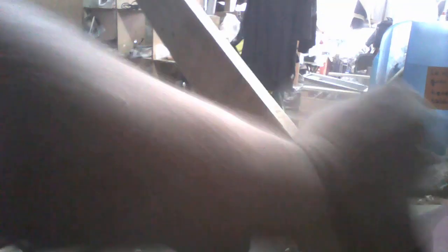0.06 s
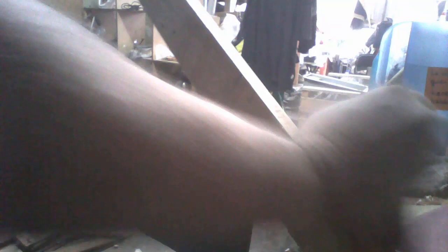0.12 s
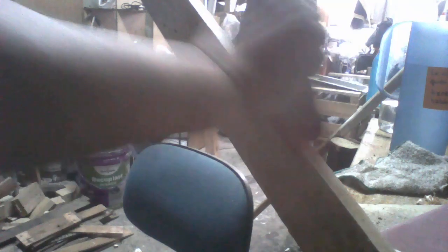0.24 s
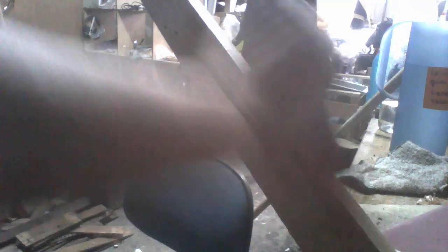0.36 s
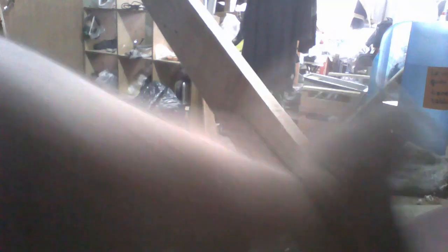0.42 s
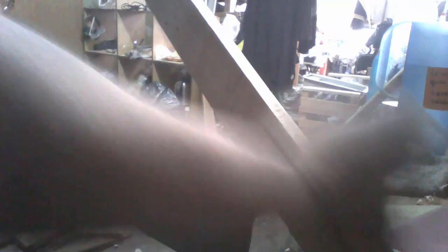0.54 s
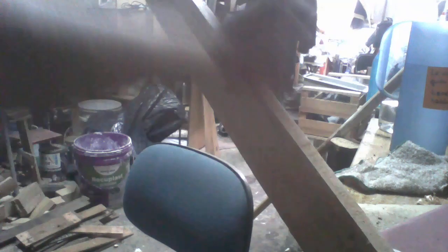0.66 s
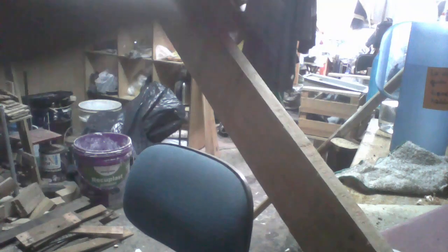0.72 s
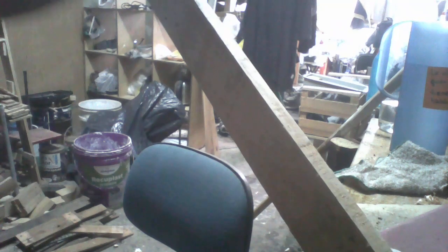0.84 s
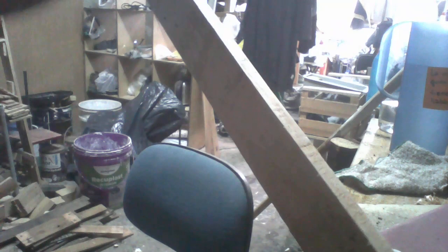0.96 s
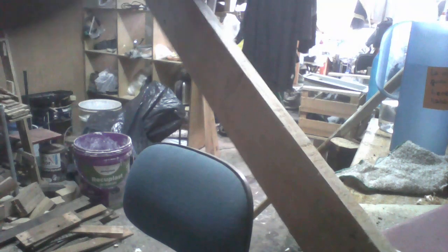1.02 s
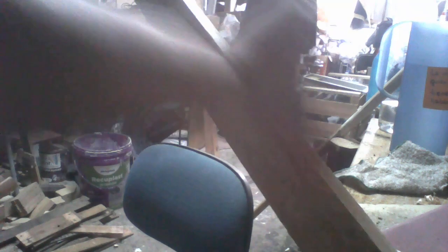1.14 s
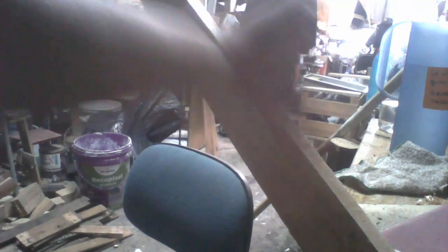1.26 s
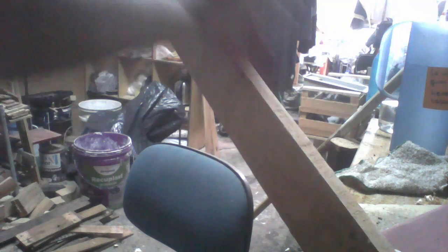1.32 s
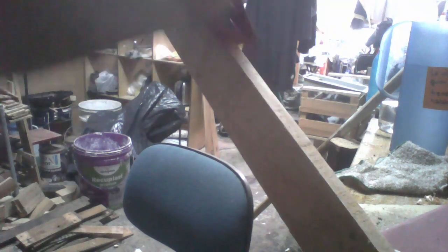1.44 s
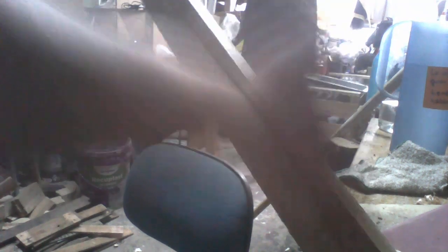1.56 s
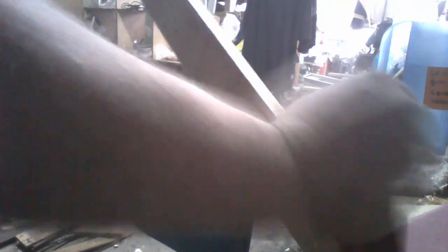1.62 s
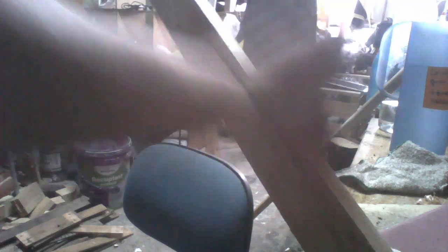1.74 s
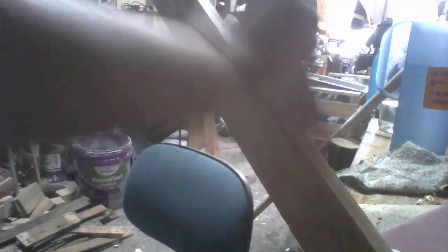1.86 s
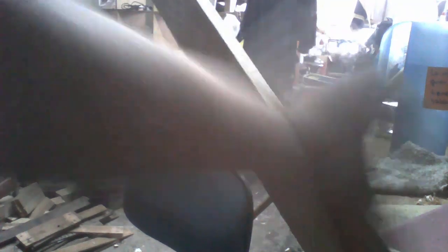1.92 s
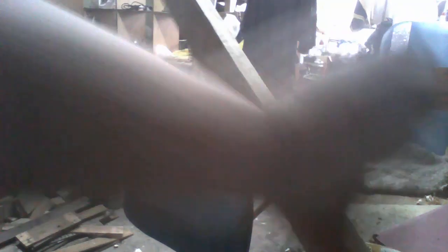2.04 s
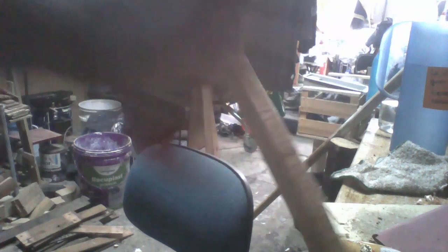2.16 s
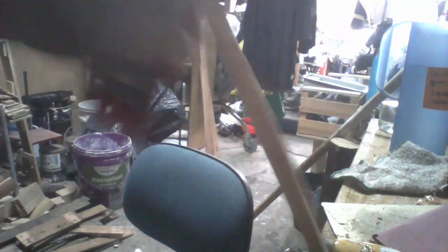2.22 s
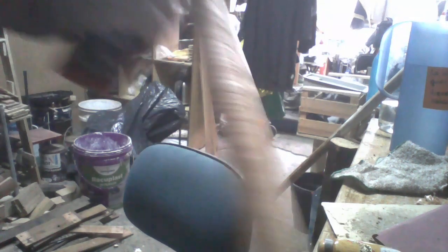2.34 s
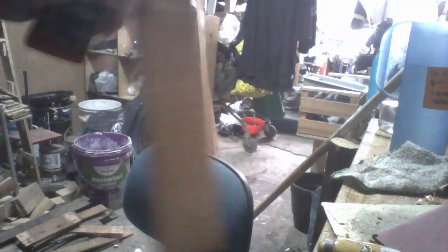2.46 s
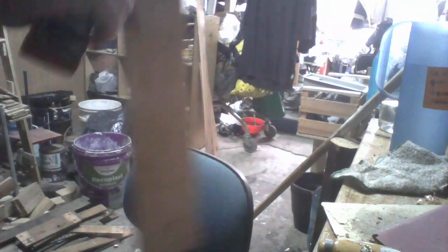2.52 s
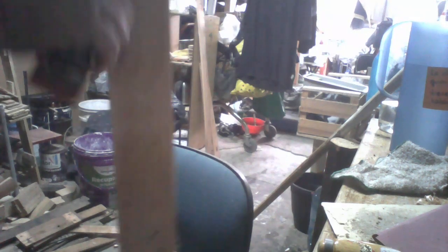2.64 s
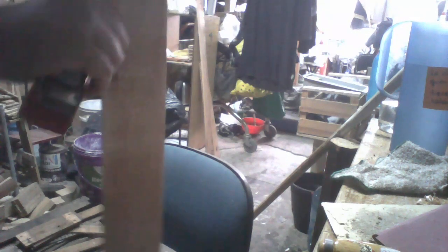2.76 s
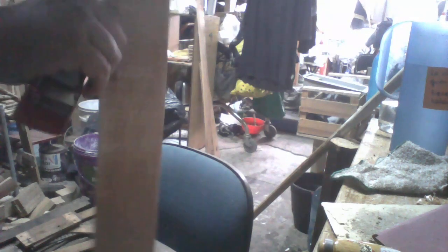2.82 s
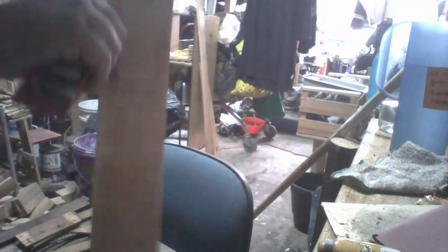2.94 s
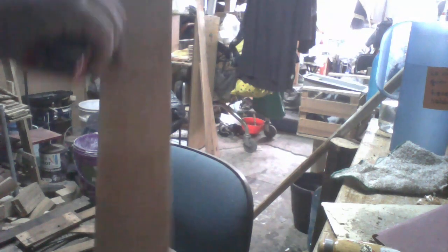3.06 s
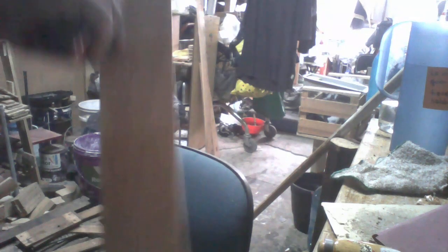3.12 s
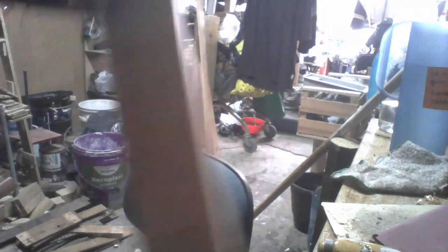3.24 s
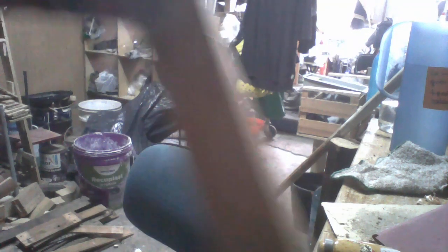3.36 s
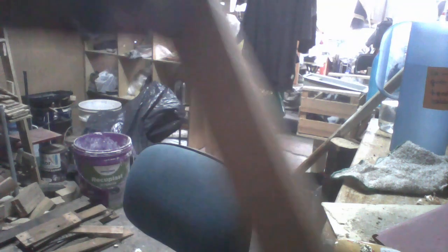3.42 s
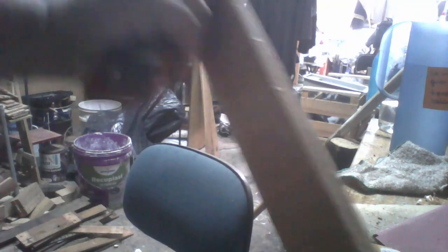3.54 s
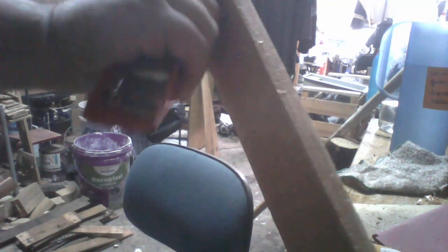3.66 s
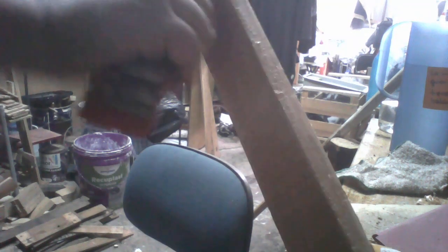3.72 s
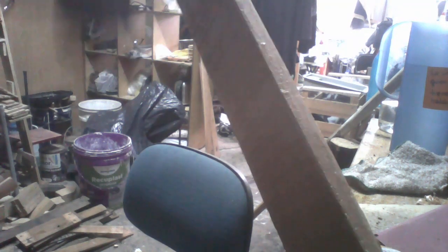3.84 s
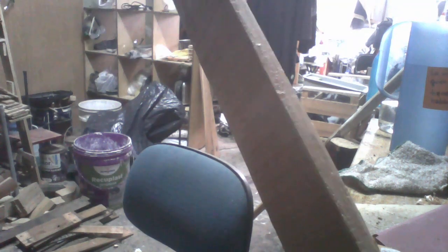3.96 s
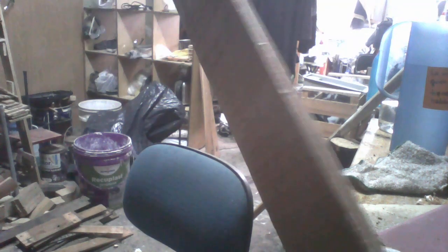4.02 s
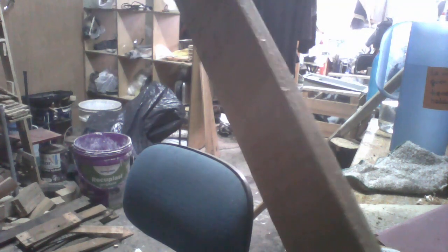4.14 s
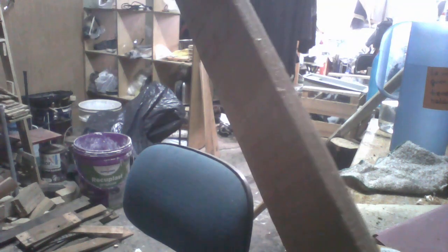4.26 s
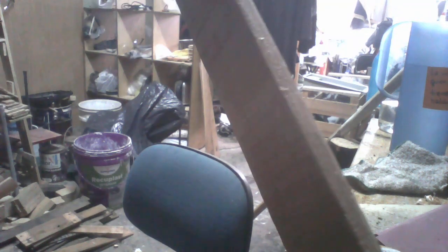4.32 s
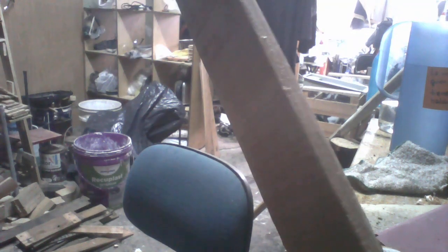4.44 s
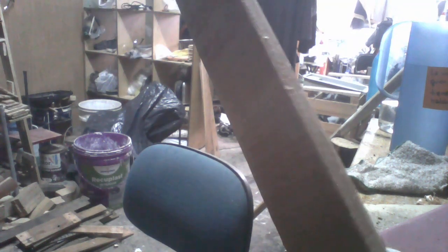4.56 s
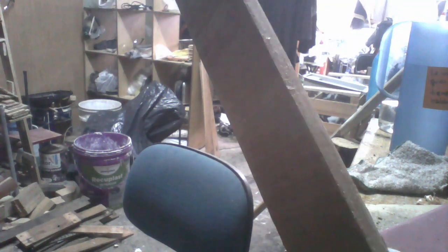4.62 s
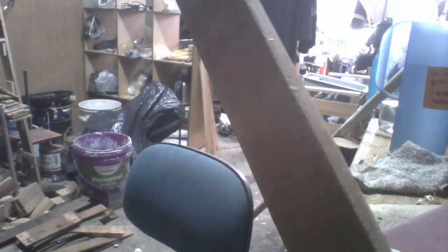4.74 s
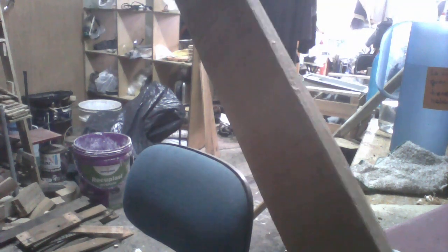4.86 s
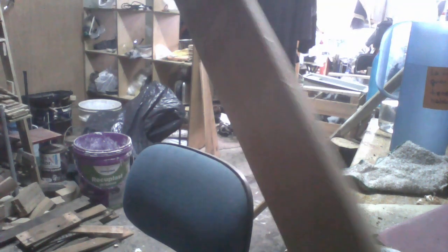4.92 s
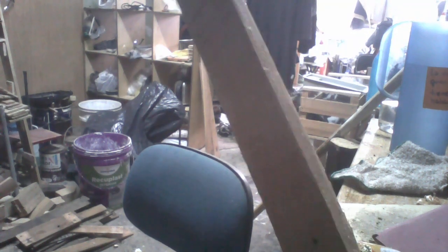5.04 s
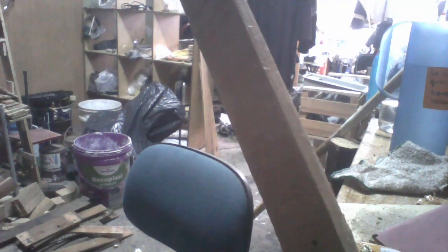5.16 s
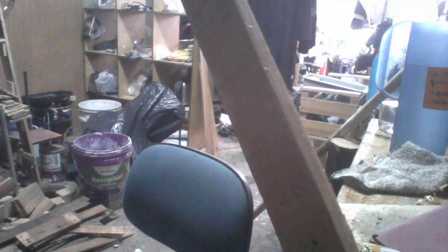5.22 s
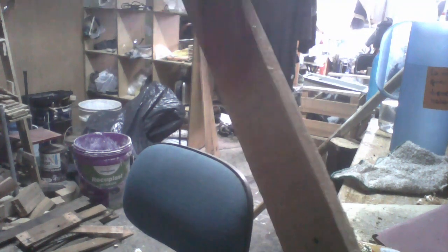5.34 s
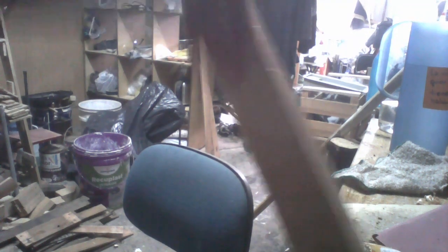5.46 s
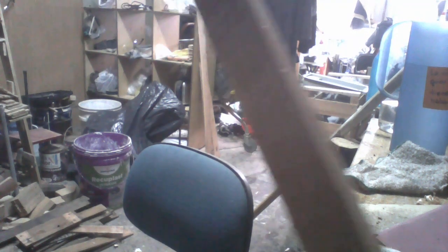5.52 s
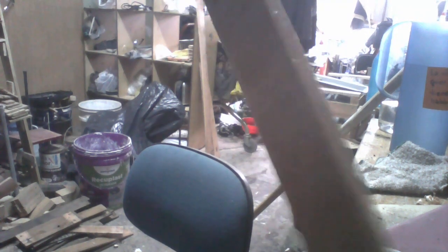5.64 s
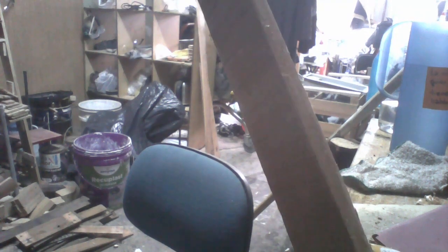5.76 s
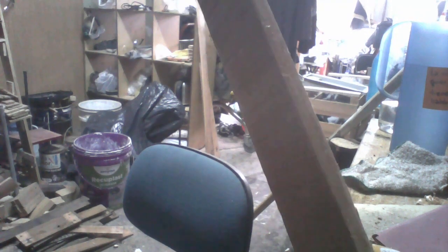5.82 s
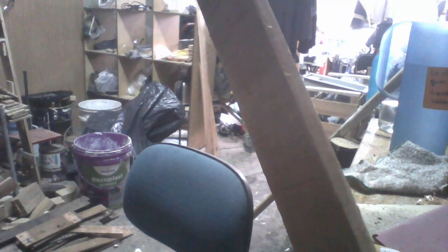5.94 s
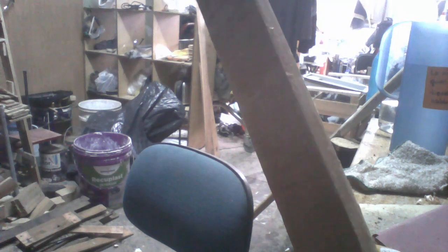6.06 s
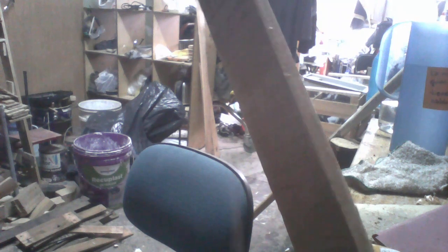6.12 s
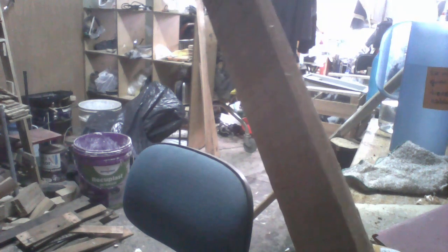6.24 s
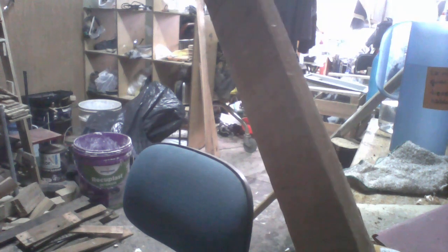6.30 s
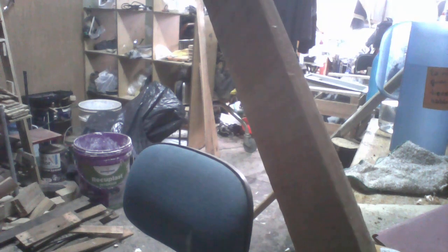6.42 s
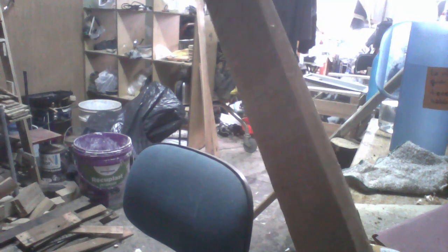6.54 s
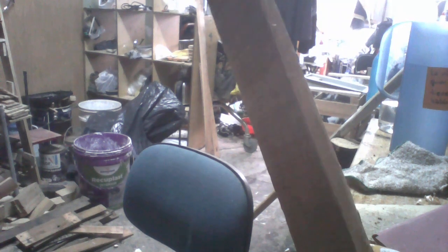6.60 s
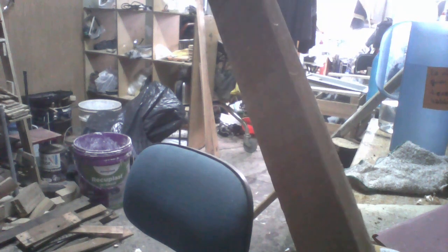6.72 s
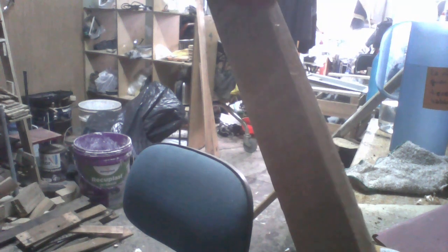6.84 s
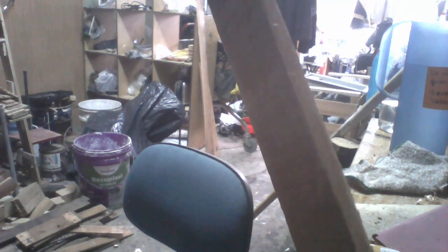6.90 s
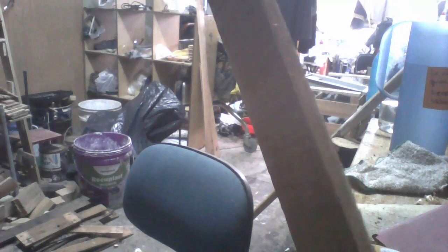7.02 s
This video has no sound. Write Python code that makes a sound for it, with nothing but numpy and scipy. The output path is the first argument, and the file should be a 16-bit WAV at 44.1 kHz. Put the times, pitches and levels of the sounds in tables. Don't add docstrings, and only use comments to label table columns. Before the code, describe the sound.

In a cluttered workshop, a hand tool scrapes a long wooden board right beside a small microphone. From 0 to about 2.1 seconds, rapid strong strokes alternate with lighter returns: low stuttering wooden judder, coarse mid rasp and bright dry hiss, mixed with dull knocks, ticks and splintery cracks. A last short scrape comes at 2.3, then the work pauses, leaving faint finger rubbing and small woody squeaks over low room noise. At 3.5 a heavy dull knock hits the board; at 4.1 a sharp, hard double clack rings briefly. Scraping resumes at 4.5, at first in separate strokes, with a deep thump near 5.2 and the hardest blow at 5.7, distorting. Denser strokes and knocks continue from 6 to about 7.1. Handling rumble, short reverberation, a faint drone and thin pulsing high electronic tones persist underneath.

```python
import sys
import numpy as np
from scipy import signal
from scipy.fft import rfft, irfft
from scipy.io import wavfile
from scipy.ndimage import uniform_filter1d

SR = 44100
rng = np.random.default_rng(int(sys.argv[2]) if len(sys.argv) > 2 else 0)


def voltage_ratio(decibels):
    exponent = np.asarray(decibels, float) / 20
    return 10 ** exponent


def dump_mix(stems):
    frames = np.atleast_2d(stems).T
    limited = np.clip(frames, -1, 1)
    pcm = np.round(limited * 32767).astype(np.int16)
    wavfile.write(sys.argv[1], SR, pcm)


N = 312228

# t/s, length/s, fastest point/share of length, edge level/dB, judder level/dB
CUTS = [(-.05, 0.2, 0.17, -18.5, -5.5), (.335, 0.18, 0.66, -20.5, -10.5), (.535, 0.2, 0.45, -22.5, -10),
        (.97, 0.27, 0.58, -23, -11.5), (1.46, 0.21, 0.71, -19.5, -6.5), (1.85, 0.14, 0.49, -22.5, -9),
        (2.31, 0.069, 0.8, -26.5, -17), (4.51, 0.22, 0.51, -20, -10), (4.86, .24, 0.6, -23, -18.5),
        (5.24, 0.19, 0.38, -22, -13.5), (5.95, 0.14, 0.72, -18.5, -7), (6.35, 0.16, 0.75, -20, -14),
        (6.7, 0.15, 0.69, -17, -8.5), (7.02, 0.13, 0.42, -26, -20)]
RETURNS = [(.15, 0.16, 0.78, -28, -22), (.67, 0.33, 0.11, -30.5, -20.5), (.8, 0.43, 0.14, -44.5, -36),
           (1.15, 0.067, 0.31, -27, -9.5), (1.235, 0.11, 0.21, -29.5, -34), (1.27, 0.2, 0.22, -28, -16.5),
           (1.687, 0.18, 0.46, -25, -13), (4.465, 0.11, 0.32, -37.5, -26.5), (4.86, 0.082, 0.26, -50, -51),
           (5.01, 0.064, 1, -40, -43), (5.12, 0.13, 0.63, -30, -26), (5.445, 0.081, 0.15, -41, -26),
           (5.49, 0.028, .7, -38.5, -39), (5.84, 0.14, 0.84, -31.5, -19.5), (6.12, 0.22, 0.5, -28.5, -20),
           (6.51, 0.23, 0.19, -28.5, -20), (6.321, 0.07, 0.38, -33.5, -22.5),
           (6.704, 0.076, 0.35, -23.5, -11.5), (6.84, 0.34, 0.16, -31.5, -26.5)]
# t/s, length/s, fastest point/share, hiss level/dB, rasp level/dB
SLIDES = [(2.261, 0.057, 0.38, -48, -36), (2.38, 0.26, 0.05, -45, -38), (2.603, 0.043, 0.2, -46, -46),
          (2.627, 0.21, 0.64, -43, -50), (2.786, 0.096, 0.38, -37.5, -47), (2.86, 0.096, 0.85, -45, -49),
          (2.959, 0.25, 0.5, -43, -45.5), (3.128, 0.27, 0.22, -43, -47), (3.275, 0.14, 0.43, -46, -40.5),
          (3.344, 0.41, 0.25, -35.5, -43), (3.7, 0.41, 0.1, -50.5, -51), (3.868, 0.15, 0.44, -48.5, -48),
          (4.052, 0.052, 0.7, -47, -56), (2.02, .3, 0.1, -54, -52), (2.485, .13, 0.07, -44, -50),
          (4.365, 0.13, 0.14, -45, -43)]
SKIDS = [
    (3.29, 0.12, 0.42, -42, -43),
    (3.51, 0.13, 0.067, -33, -32),
    (4.13, 0.22, 0.23, -41, -29),
    (4.2, 0.089, .7, -36, -46),
    (5.661, 0.019, 0.1, -28, -29),
    (5.672, 0.084, 0.23, -36, -42),
    (5.74, 0.071, 0.13, -28, -25.5),
]
# t/s, peak level/dB, f/Hz
JOLTS = [(0.029, 1, 341), (0.069, -3.5, 341), (0.171, -10.5, 304), (0.434, -6, 308), (0.479, -6, 488),
         (0.58, -14, 263), (0.619, -7, 310), (0.649, -1, 290), (0.711, -9, 257), (0.8, -11.5, 344),
         (0.89, -19, 373), (0.974, -15.5, 398), (1.005, -17, 330), (1.079, -4.5, 351), (1.114, -4, 333),
         (1.381, -10.5, 400), (1.487, -13, 309), (1.524, -5.5, 418), (1.622, 2, 345), (1.644, -1, 333),
         (1.736, -10, 320), (1.767, -11, 246), (1.929, -8, 493), (2.362, -12, 416), (4.497, -26, 390),
         (4.549, -24, 356), (3.52, -7.5, 490), (3.565, -20, 492), (4.625, -5, 428), (4.64, -1, 147),
         (5.48, -17.5, 147), (4.639, -1, 454), (4.659, -6, 460), (4.714, -15, 459), (4.94, -17, 345),
         (4.953, -10.5, 316), (5.299, -5.5, 370), (5.319, -9.5, 478), (6.045, -3, 349), (6.077, -6.5, 468),
         (6.112, -8, 387), (6.339, -13.5, 397.4), (6.378, -13, 384), (6.411, -7.5, 400), (6.431, -3.5, 361),
         (6.452, 0, 392), (6.489, -6.5, 547), (6.534, -12, 348), (6.568, -13, 331), (6.764, 0, 370),
         (6.808, 2.5, 370), (6.824, -3.5, 530), (6.879, -11, 383), (7.054, -11.5, 399)]
# t/s, length/s, peak level/dB, f/Hz
STREAKS = [(0.159, 0.022, -26.5, 3060), (0.207, 0.021, -24, 2400), (0.58, 0.03, -20.5, 2860),
           (.3, 0.014, -33, 1300), (0.771, 0.057, -40, 2240), (1.242, 0.027, -25, 10000),
           (1.381, 0.0056, -13, 5750), (1.187, 0.026, -16, 1400), (1.49, 0.053, -26, 2000),
           (1.772, 0.028, -25, 5700), (2.321, 0.024, -20.5, 3210), (2.319, 0.079, -24, 1090),
           (2.324, .02, -29, 6500), (2.836, .08, -46, 2240), (2.601, .03, -42, 2890),
           (3.05, 0.053, -43, 4150), (2.595, 0.026, -39, 2220), (2.744, 0.067, -37, 5750),
           (2.747, 0.036, -41, 5100), (2.814, 0.039, -32.5, 2250), (2.82, 0.025, -35, 5720),
           (2.812, 0.023, -33.5, 4200), (2.924, .03, -38.5, 2350), (2.988, .03, -39, 2300),
           (3.33, 0.056, -41, 1200), (3.33, 0.039, -43, 680), (4.87, 0.026, -31, 1200),
           (4.897, 0.032, -31, 1220), (4.88, 0.042, -26, 2000), (5.299, 0.043, -18, 1630),
           (5.74, 0.041, -7.5, 850), (5.745, 0.039, -21, 1340), (4.588, 0.065, -12.5, 7400),
           (4.95, 0.039, -23, 7600), (4.962, .05, -24, 12000), (5.296, 0.045, -21, 7200),
           (6.43, .05, -25, 11300), (6.028, 0.03, -14, 1700), (6.156, 0.072, -28, 2200),
           (6.41, 0.022, -24, 4400), (6.679, .04, -36.5, 2100), (6.787, 0.022, -12.5, 1660),
           (6.789, 0.021, -11.5, 2420), (0.91, 0.076, -28.5, 4950), (0.95, 0.066, -35, 3800),
           (3, 0.15, -40, 3480), (2.86, 0.28, -51, 2240), (2.9, .12, -43, 1190), (5.76, 0.056, -18.5, 720),
           (6.5, .12, -35, 4900), (1.8, .08, -29, 1040), (.58, 0.054, -18.5, 1180)]
# t/s, peak level/dB, ring/share 0-1, whip of the lowest modes/dB
THUDS = [(0.011, -3.5, 0.88, -28), (0.247, -7.5, 0.17, -17), (0.383, -2, 0.66, -21), (0.42, -5.5, 0.7, -30),
         (0.455, -8, 0.3, -22), (0.469, -2, 0.07, -37), (1.154, -7.5, 0.2, -29), (1.186, -2, 0.34, -43),
         (1.312, -11.5, 0.39, -30), (1.561, -5, 0.9, -32), (1.588, 1.5, 0.82, -40), (1.898, -4, 0.37, -11),
         (2.325, -18, 0.2, -13), (3.503, 6, 0.21, -9.5), (3.509, -6.5, 0.5, -1), (3.513, -4, 0.26, 6),
         (3.566, -18, 0.2, -12), (4.136, -7.5, 0.37, -7.5), (4.98, -8.5, 0.55, -0.5),
         (5.183, -1.5, 0.2, 4.5), (5.223, -13, 0.26, 13), (5.7335, 7.5, 0.32, -37), (5.755, 0, 0.2, -29),
         (5.977, -2, 0.53, -13), (6.011, -0.5, 0.5, -20), (6.471, -2.5, 0.55, -27), (6.727, -5, 0.3, -9),
         (6.758, -4, 0.12, -23), (6.804, 1.5, 0.14, -26)]
# t/s, peak level/dB, treble share/dB, splinter f/Hz
TICKS = [(0.014, 3, -9.5, 970), (0.221, -11, 4, 2160), (0.382, 3, -5, 1000), (0.582, -10, 1, 1210),
         (0.644, -4.5, 0, 2390), (1.032, -14.5, 5, 2170), (1.188, 1.5, -5, 2220), (1.315, -7.5, -2, 5800),
         (1.383, -7, -2, 1269), (1.491, -13, -6, 2040), (1.589, 0.5, -10, 1760), (1.881, -6.5, -5, 764),
         (1.915, -4, -6, 1496), (2.118, -31, 1, 3200), (2.143, -26, 8, 2320), (2.315, -26, -12, 1040),
         (2.331, -14.5, -15, 3170), (2.36, -8.5, -9, 1080), (2.816, -35, 21, 2280), (3.511, -16, 7, 820),
         (4.872, -24.5, -20, 1160), (5.188, -9.5, -21, 950), (5.225, 3, 2, 1494), (5.663, -24, -4, 1250),
         (5.737, -4, -4, 800), (5.755, 0.5, -15, 940), (6.009, -8.5, 8, 1640), (6.516, -3.5, -7, 1640),
         (6.592, -6.5, -5, 4600), (6.726, -8.5, 10, 886)]
CHIPS = [(.2483, -31, -6, 900), (1.2491, -20, -6, 890), (1.103, -30, -8, 2200), (1.425, -25, -10, 1200),
         (5.678, -21, -12, 700), (3.049, -45, 8, 5840), (3.199, -40, 13, 6040), (4.187, -8, -18, 1670),
         (4.9716, -13, -1, 1630), (5.3004, -17, -3, 1500), (5.9767, -14, -2, 780),
         (6.1476, -19.5, 11, 2230), (6.6154, -27, 0, 930), (6.7096, -16.5, -4, 1260),
         (6.741, -14, -3, 2200), (6.991, -16.5, 2, 1470)]
# t/s, peak level/dB
SPARKS = [(1.9056, -22), (2.497, -36), (3.5135, -8), (4.134, -12), (4.652, -22), (5.182, -27), (5.21, -22),
          (5.7628, -21), (6.469, -19), (6.872, -27), (6.887, -19), (6.894, -13)]
# t/s, peak level/dB
CLACKS = [
    (4.118, 0),
    (4.1254, 1.5),
    (4.134, 10.5),
    (4.1417, 1),
]
# t/s, level/dB
GRIP = [(0.0, -51), (0.16, -20.5), (1.03, -41), (1.16, -26.5), (3.39, -42), (3.51, -29), (3.84, -35.5),
        (4.57, -35.5), (4.67, -23), (4.95, -43), (5.19, -21), (5.68, -39), (5.76, -18), (5.98, -29),
        (6.07, -13.5), (6.43, -34), (6.53, -16.5), (7.08, -26.5)]

# f/Hz, level/dB, t60/s
BEND_MODES = [(244, -17.5, 0.47), (320, 7, 0.074), (468.3, -3.5, 0.39), (529.6, -5.5, 0.68),
              (632, -16.5, 0.37), (697.6, -6, 0.28), (783, -6, 0.14), (957, -1.5, 0.19)]
# f/Hz, level/dB, t60/s
WHIP_MODES = [(133.1, 9, 0.43), (153, -0.5, 0.21)]
# f/Hz, level/dB, t60/s
CLACK_MODES = [(530, -16, 0.51), (680, -14.5, 0.19), (4300, -23, 0.1), (1095, -9, 0.13), (1260, -15, 0.097),
               (1527, -2.5, 0.21), (1365, -4, .12), (1627, 2, 0.13), (1660, -3, 0.16), (2090, 3.5, 0.061),
               (2200, -6, 0.2), (2320, -8, 0.23), (2770, -16.5, 0.34), (3520, -13, .2)]
# f/Hz, width/Hz, level/dB
LENGTHWISE_MODES = [(1610, 100, -9), (2230, 45, -2), (2830, 45, -5), (3490, 50, -6), (4190, 70, -7),
                    (4910, 120, -11), (5720, 78, -5), (6480, 96, -10)]

# f/Hz, level/dB
BODY = [(47, -45.5), (80, -16.5), (151, 0.5), (262, -16), (333, 3.5), (500, -3.5), (544, -5.5),
        (651, -13.5), (760, -10), (1300, -23.5), (1820, -49), (3080, -120)]
CUT = [(410, -15.5), (700, -17.5), (779, -16.5), (1690, -3.5), (1880, -12), (2090, 1.5), (3290, -10),
       (5000, -11.5), (6500, -11), (11000, -120)]
DUST = [(2350, -8), (4000, -8), (4930, -5), (5720, -9.5), (6860, -1), (7220, 0), (8510, 0.5), (10400, -1),
        (12400, -1.5), (15500, -14.5)]
DULL = [(9000, 0), (12000, -2), (15500, -8)]
SNAP = [(500, -0.5), (1200, 0.5), (2300, -1.5), (4500, -11.5), (8000, -39.5)]
TOOL = [(3500, -25), (5800, 9.5), (7200, 1), (8800, 5.5), (12000, -10), (15500, -22)]
SPARK = [(4000, -22), (8000, -7), (13000, 1), (16000, -8)]
CLACK_RATTLE = [(150, -19), (700, -4.5), (1900, 4), (3500, -7), (6000, -11), (12000, -21.5), (16000, -51)]
SHOP = [(53, -29), (90, 3.5), (195, -4.5), (398, -12.5), (1070, -18), (1480, -20.5), (3150, -22.5),
        (8130, -24.5), (12000, -27), (13100, -27), (15500, -28)]
RUMBLE = [(12, -29), (25, 3), (38, 7), (60, 2), (90, -2.5), (140, -41)]
WHINE = [(8020, -71), (12651, -70), (13372, -67), (14675, -71)]
# band f/Hz, t60/s
ROOM_T60 = [(200, 0.51), (1000, 0.45), (4000, 0.3), (12000, 0.21)]

RISE_DB, FALL_DB, ROUND = 15.5, 22, 1.2
SEAT = 0.074
JUDDER_RISE_DB, JUDDER_FALL_DB = 21.5, 26.5
JUDDER_LEAD_S = 0.02
RASP_STEEP = 1.23
CUT_RASP_DB, RETURN_RASP_DB, PRESSED_RASP_DB = -2.5, -4, -25
SLIDE_JUDDER_DB = -24
JUDDER_RING_S, RASP_RING_S = 0.018, 0.01
SHAKE_DB, SHAKE_S = -14, 0.029
CUT_FREE_DB, RETURN_FREE_DB, SLIDE_FREE_DB = -14.5, -7, 5
RUMBLE_DB, RUMBLE_LAG_S = -20, 0.052
DULL_DB, BRIGHT_DB = -53, -17.5
SWAY_DB = -13
JOLT_DB, JOLT_T60_S, JOLT_RISE_S = -3.5, 0.066, 0.002
CRACKLE_DB, CRACKLE_S = -15, 0.01
STREAK_RING_S, BROAD_HZ = .03, 3500
TICK_RING_S, TIGHT_HZ = .04, 1800
PUSH_MS, PUSH_MS_PER_DB = 2.03, 0.03
CHATTER, CLACK_DAMP = .4, .45
WORK_ROOM_DB, BLOW_ROOM_DB, CLACK_ROOM_DB = -11.5, -9, -14
DUCK_DB, DUCK_S, DUCK_KNEE_DB = -1.5, 0.81, -34
SHOP_DB, HUM_HZ, HUM_DB = -47.5, 598, -59
WHINE_PERIOD_S, WHINE_START_S = .06, .051


def scrape(judder_db, rasp_db, hiss_db, free_db):
    jolts = uniform_filter1d(grains(700, 1.8), 16)
    bend = wander(jolts, BEND_MODES, .22, 16, 3.5)
    judder = with_rms(bend) + with_rms(colour(jolts, BODY), 2.6)

    bite = voltage_ratio(walk(95))
    tear = grains(3000, 1.3) * bite
    wood_modes = [(hz, db + 20 * np.log10(width / 50) - hz / 750, 2.2 / width)
                  for hz, width, db in LENGTHWISE_MODES]
    wood = wander(tear, wood_modes, 1.05, 24, 1.8)
    fibre_modes = [(hz, 0, .014) for hz in np.geomspace(750, 4000, num=8)]
    fibres = wander(tear, fibre_modes, 1, 32, 4)
    tearing = with_rms(colour(tear, CUT)) + with_rms(colour(fibres, CUT), -2)
    rasp = with_rms(tearing) + with_rms(wood, -3) * voltage_ratio(free_db)
    rasp = rasp / np.sqrt(1 + voltage_ratio(free_db) ** 2)

    fine = grains(7000, 0.58) * voltage_ratio(0.11 * walk(63)) * bite
    blade_modes = [(hz, 0, .003) for hz in np.geomspace(5400, 11500, num=7)]
    blade = wander(fine, blade_modes, 1, 50, 2.4)
    hiss = with_rms(colour(fine, DUST)) + with_rms(colour(blade, DUST), -6)
    fast = np.clip((hiss_db - DULL_DB) / (BRIGHT_DB - DULL_DB), 0, 1)
    hiss = fast * hiss + (1 - fast) * colour(hiss, DULL)
    return with_rms(judder, -3) * voltage_ratio(judder_db) + rasp * voltage_ratio(rasp_db) + with_rms(hiss) * voltage_ratio(hiss_db)


def effort():
    cut, back, slide = (speed(rows, column=3) for rows in (CUTS, RETURNS, SLIDES + SKIDS))
    hiss = cut + back + slide

    blows = np.zeros(N)
    for s, db, *_ in THUDS:
        blows[int(s * SR)] = voltage_ratio(db + SHAKE_DB) ** 2 * SHAKE_S * SR
    push = speed(CUTS + RETURNS, 4, JUDDER_RISE_DB, JUDDER_FALL_DB, JUDDER_LEAD_S)
    judder = linger(push + slide * voltage_ratio(SLIDE_JUDDER_DB) ** 2, JUDDER_RING_S) + linger(blows, SHAKE_S)

    steep_cut = speed(CUTS, 3, RISE_DB * RASP_STEEP, FALL_DB * RASP_STEEP)
    pressed = steep_cut * voltage_ratio(CUT_RASP_DB) ** 2 + push * voltage_ratio(PRESSED_RASP_DB) ** 2 + speed(SKIDS, column=4)
    drawn = back * voltage_ratio(RETURN_RASP_DB) ** 2
    loose = speed(SLIDES, column=4)
    pressed, drawn, loose = (linger(part, RASP_RING_S) + 1e-12 for part in (pressed, drawn, loose))
    rasp = pressed + drawn + loose
    free_db = (pressed * CUT_FREE_DB + drawn * RETURN_FREE_DB + loose * SLIDE_FREE_DB) / rasp

    grip = voltage_ratio(np.interp(np.arange(N) / SR, *np.transpose(GRIP)) - 4) ** 2
    arm = linger(linger(judder, RUMBLE_LAG_S), RUMBLE_LAG_S)
    rumble = grip + arm * voltage_ratio(RUMBLE_DB) ** 2
    return to_db(judder), to_db(rasp), to_db(hiss), free_db, to_db(rumble)


def speed(rows, column, rise_db=RISE_DB, fall_db=FALL_DB, lead_s=0):
    energy = np.zeros(N)
    for row in rows:
        touch, length, share = row[:3]
        start, end = touch - lead_s, touch + length
        top = touch + length * np.clip(share, .03, .97)
        at = np.arange(max(int(start * SR), 0), min(int(end * SR), N))
        along = np.interp(at / SR, [start, top, end], [0, 1, 0])
        lost_db = np.where(at / SR < top, rise_db, fall_db) * (1 - along) ** ROUND
        energy[at] += (voltage_ratio(row[column] - lost_db) * np.minimum(along / SEAT, 1)) ** 2
    return energy


def sway(judder_db):
    swing = ring(rng.standard_normal(N) * voltage_ratio(judder_db), WHIP_MODES, 0.21)
    return with_rms(swing, SWAY_DB) * np.sqrt(np.mean(voltage_ratio(judder_db) ** 2))


def jolt(t, noise, hz):
    shape = (1 - np.exp(-t / JOLT_RISE_S)) * np.exp(-np.log(1000) * t / JOLT_T60_S)
    partial = 0.17 * np.sin(2 * np.pi * 1.43 * hz * t + noise[0])
    swing = shape * (np.sin(2 * np.pi * hz * t) + partial)
    crackle = colour(noise * np.exp(-t / CRACKLE_S), SNAP)
    return with_rms(swing) + with_rms(crackle, CRACKLE_DB)


def streak(t, noise, seconds, hz):
    rub = noise * np.sin(np.pi * np.clip(t / seconds, 0, 1))
    return ring(rub, [(hz, 0, STREAK_RING_S * min(1, BROAD_HZ / hz))])


def thud(t, noise, push_ms, free, whip_db):
    t = np.maximum(t - .0015, 0)
    push = np.sin(np.pi * np.clip(t * 1000 / push_ms, 0, 1)) ** 2
    settle = np.exp(-t / (0.052 * free)) * np.clip(t / 0.0034, 0, 1)
    rattle = with_rms(colour(noise, BODY) * settle, -0.29) + with_rms(colour(noise, SNAP) * settle, -18.5)
    bend = rattle - with_rms(ring(push, BEND_MODES, free))
    return with_rms(bend) + with_rms(ring(push, WHIP_MODES, free), whip_db + 1.5)


def tick(t, noise, treble_db, hz):
    snap = noise * np.exp(-t / .0015)
    crack = snap + 1.36 * noise * np.exp(-t / (0.16 * TICK_RING_S))
    splinter = ring(snap, [(hz, 0, TICK_RING_S * min(1, TIGHT_HZ / hz))], .45)
    wood, steel = colour(crack, SNAP), colour(crack, TOOL)
    low = wood / np.abs(wood).max() + 0.85 * max(1, hz / BROAD_HZ) * splinter / np.abs(splinter).max()
    return low + voltage_ratio(treble_db - 1.5) * steel / np.abs(steel).max()


def spark(t, noise):
    return colour(noise * np.exp(-t / 0.00054), SPARK)


def clack(t, noise):
    crack = noise * (np.exp(-t / 0.002) + 0.083 * np.exp(-t / 0.047))
    knock = np.exp(-t / .00008)
    modes = ring(knock + CHATTER * crack, CLACK_MODES, CLACK_DAMP)
    return with_rms(modes) + with_rms(colour(crack, CLACK_RATTLE), -3)


def to_db(energy):
    return 10 * np.log10(energy + 1e-9)


def with_rms(x, db=0):
    return x * voltage_ratio(db) / np.sqrt(np.mean(x ** 2))


def colour(x, points):
    hz, db = np.transpose(points)
    grid = np.maximum(np.arange(2049) * SR / 4096, 1)
    log_gain = np.interp(np.log(grid), np.log(hz), db) * np.log(10) / 20
    cepstrum = irfft(log_gain)
    cepstrum[1:2048] *= 2
    cepstrum[2049:] = 0
    return signal.fftconvolve(x, irfft(np.exp(rfft(cepstrum))))[:len(x)]


def ring(x, modes, damp=1.0):
    out = 0
    for k, (hz, db, t60) in enumerate(modes):
        r = np.exp(-np.log(1000) / (t60 * damp * SR))
        w = 2 * np.pi * hz / SR
        mode = signal.lfilter([0, r * np.sin(w)], [1, -2 * r * np.cos(w), r * r], x)
        out = out + (-1) ** k * voltage_ratio(db) * mode
    return out


def wander(x, modes, damp, rate, patchy_db):
    return sum(ring(x * voltage_ratio(patchy_db * walk(rate)), [mode], damp) for mode in modes)


def grains(rate, spread_db):
    when = rng.random(N) < rate / SR
    size = rng.exponential(size=N)
    return when * rng.standard_normal(N) * voltage_ratio(spread_db * np.minimum(size, 3.0))


def walk(rate):
    k = int(SR / rate)
    held = np.repeat(rng.standard_normal(N // k + 1), k)[:N]
    return 1.68 * uniform_filter1d(uniform_filter1d(held, k), k)


def linger(energy, seconds):
    keep = np.exp(-1 / (seconds * SR))
    return signal.lfilter([1 - keep], [1, -keep], energy)


def place(rows, shape, seconds):
    out, t = np.zeros(N), np.arange(int(seconds * SR)) / SR
    for s, db, *rest in rows:
        piece = shape(t, rng.standard_normal(len(t)), *rest)
        at = int(s * SR)
        out[at:at + len(t)] += (voltage_ratio(db) * piece / np.abs(piece).max())[:N - at]
    return out


def room(x):
    t, tail = np.arange(SR // 2) / SR, 0
    for hz, t60 in ROOM_T60:
        band_shape = [(hz / 4, -30), (hz / 2, -3), (hz, 0), (hz * 2, -3), (hz * 4, -30)]
        band = colour(rng.standard_normal(len(t)), band_shape)
        tail = tail + band / band.std() * np.sqrt(hz) * np.exp(-6.9 * t / t60)
    tail = tail * np.clip(t / 0.0072, 0, 1)
    return signal.fftconvolve(x, tail / np.sqrt(np.sum(tail ** 2)))[:N]


def handling(rumble_db):
    return with_rms(colour(rng.standard_normal(N), RUMBLE)) * voltage_ratio(rumble_db)


def workshop(judder_db):
    shop = with_rms(colour(rng.standard_normal(N), SHOP), SHOP_DB)
    hum = with_rms(ring(rng.standard_normal(N), [(HUM_HZ, 0, .15)]), HUM_DB)
    loud = linger(voltage_ratio(judder_db) ** 2, DUCK_S)
    duck = voltage_ratio(DUCK_DB * loud / (loud + voltage_ratio(DUCK_KNEE_DB) ** 2))
    return duck * (shop + hum)


def whine():
    t = np.arange(N) / SR
    on = (t - WHINE_START_S) % WHINE_PERIOD_S < WHINE_PERIOD_S / 2
    gate = uniform_filter1d(1. * on, 64)
    return 2 * gate * sum(voltage_ratio(db) * np.sin(2 * np.pi * hz * t) for hz, db in WHINE)


def scene():
    judder_db, rasp_db, hiss_db, free_db, rumble_db = effort()
    streaks = [(s, db, seconds, hz) for s, seconds, db, hz in STREAKS]
    work = scrape(judder_db, rasp_db, hiss_db, free_db) + sway(judder_db) + place(streaks, streak, .35)

    thuds = [(s, db, PUSH_MS + PUSH_MS_PER_DB * db, free, whip_db) for s, db, free, whip_db in THUDS]
    blows = place(thuds, thud, .5) + voltage_ratio(-1) * place(TICKS, tick, .15)
    blows = blows + voltage_ratio(JOLT_DB) * place(JOLTS, jolt, .12)
    blows = blows + place(CHIPS, tick, .15) + place(SPARKS, spark, .02)
    clacks = place(CLACKS, clack, .4)

    sent = voltage_ratio(WORK_ROOM_DB) * work + voltage_ratio(BLOW_ROOM_DB) * blows + voltage_ratio(CLACK_ROOM_DB) * clacks
    background = handling(rumble_db) + workshop(judder_db) + whine()
    return (work + blows + clacks + room(sent) + background)[None]


def roll_off(x):
    return signal.sosfilt(signal.butter(12, 15670, fs=SR, output="sos"), x)


def record(dry):
    mix = np.clip(dry, -.99, .99)
    return roll_off(mix)


dry = scene()
out = record(dry)
dump_mix(out)
```